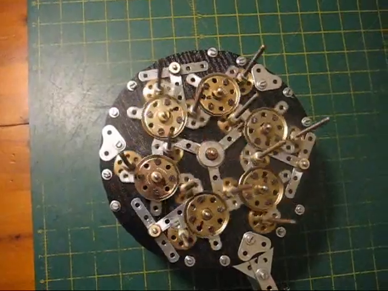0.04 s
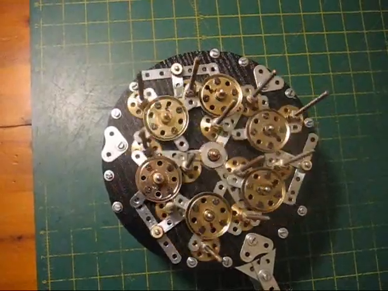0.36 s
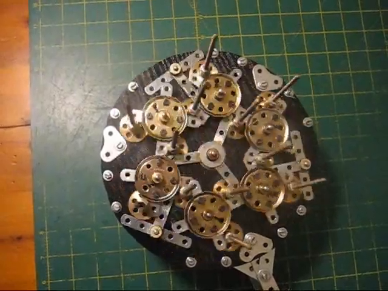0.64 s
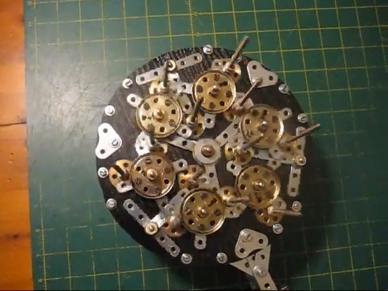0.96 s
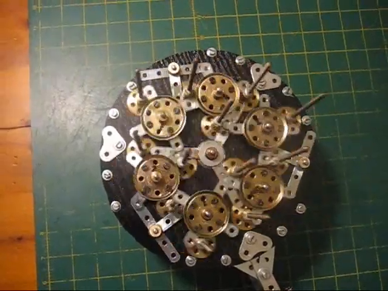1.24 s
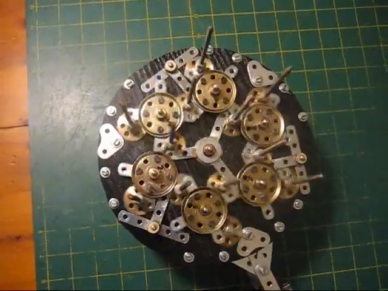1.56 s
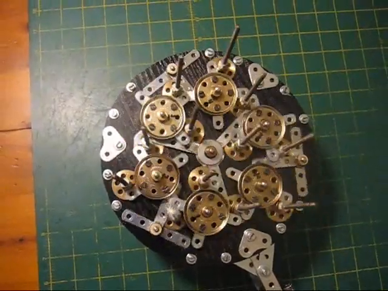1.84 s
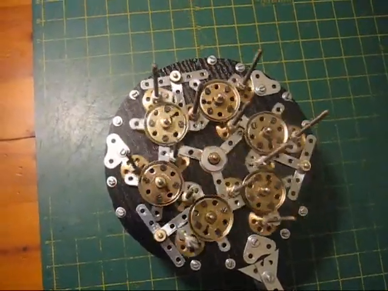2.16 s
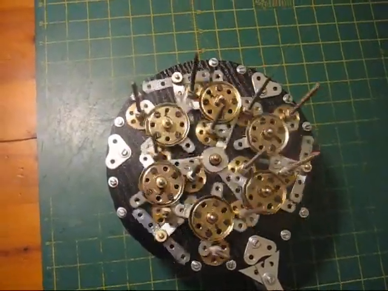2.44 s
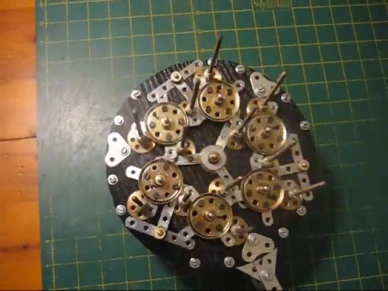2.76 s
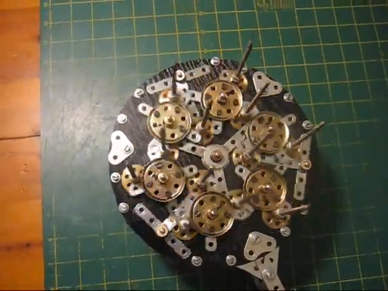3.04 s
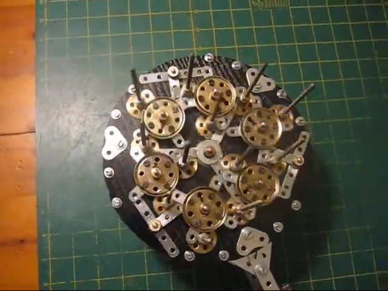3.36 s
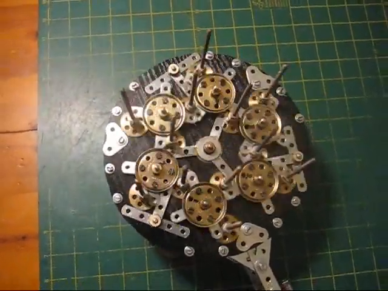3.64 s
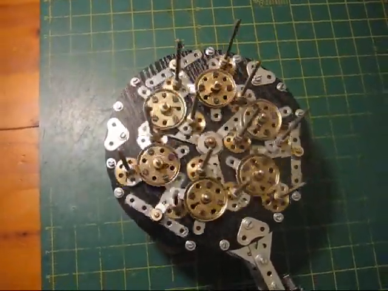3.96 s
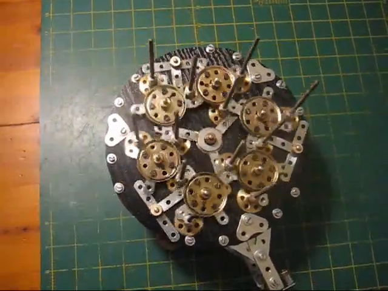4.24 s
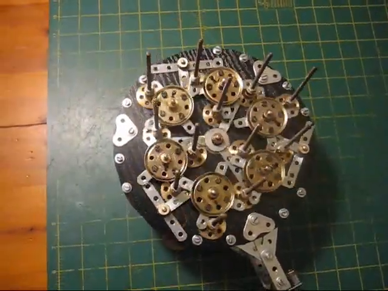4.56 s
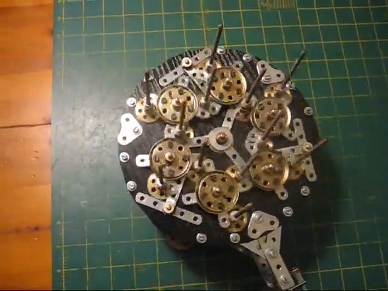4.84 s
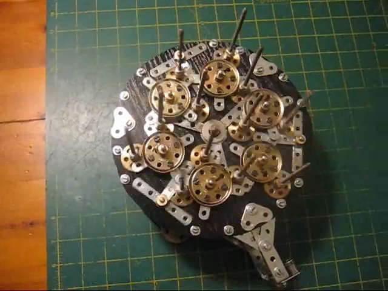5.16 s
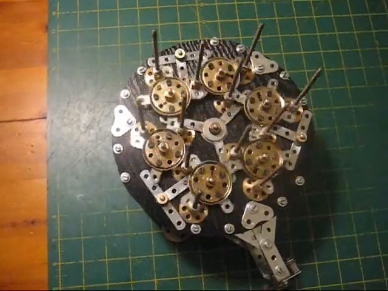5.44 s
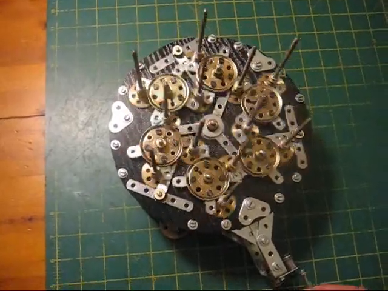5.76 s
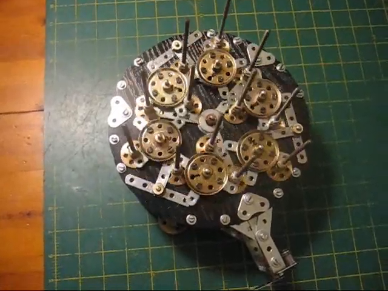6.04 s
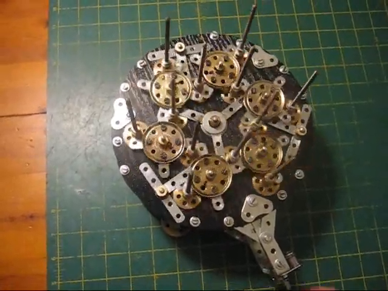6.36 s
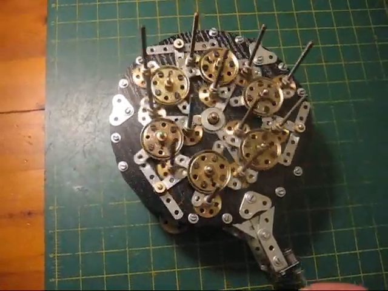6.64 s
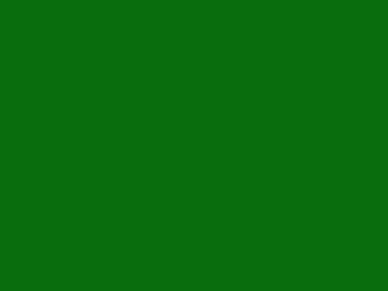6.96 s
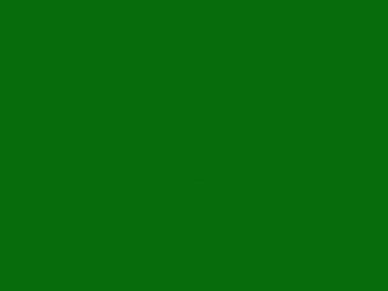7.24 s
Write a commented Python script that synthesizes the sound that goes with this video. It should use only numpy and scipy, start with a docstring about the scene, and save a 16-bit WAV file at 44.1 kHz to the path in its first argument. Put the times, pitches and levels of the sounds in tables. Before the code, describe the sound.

Rapid metallic rattling and sharp, uneven clacks come from a little gear mechanism being turned in spurts. It catches briefly several times, longest a bit past the middle, then clatters on until the sound cuts off. A faint table hum and hiss lie underneath, with one soft tone near the start. It is heard close up in a small, slightly echoing room, sounding thin, bright and grainy.

```python
"""Loose parts clack and gear teeth rattle as a model of brass gears, steel strips and rods turns.
Each clack is a part falling into its slack. The drive runs in surges and hangs at tight spots, and
the teeth rattle harder with the effort. The metal frame rings on, a small room echoes and the table
hums, over a faint hiss and one soft early tone. A small camera close above picks it all up at a
low sampling rate, which mirrors the sound into the treble."""
import sys
import numpy as np
from scipy import signal
from scipy.fft import rfft, irfft
from scipy.io import wavfile
from scipy.ndimage import uniform_filter1d

SR = 44100
rng = np.random.default_rng(int(sys.argv[2]) if len(sys.argv) > 2 else 0)


def dump_mix(stems):
    """Bounce the given channels to the path in sys.argv[1] as a 16-bit WAV at rate SR."""
    frames = np.atleast_2d(stems).T  # one column per channel
    limited = np.clip(frames, -1, 1)  # hard clip at full scale
    pcm = np.round(limited * 32767).astype(np.int16)
    wavfile.write(sys.argv[1], SR, pcm)


N = 326781
TIME = np.arange(N) / SR
HOLD_SAMPLES = 4  # the camera holds each value this long
BAND_HZ = SR / HOLD_SAMPLES / 2  # the highest pitch it can capture
EASY_DB = -32.5  # the effort in easy running


# Loose parts falling into their slack. Each row: start in seconds, relative level in dB,
# base plate thud in dB, bright edge in dB.
CLACK_HITS = [(0.0068, -18, 13.5, 20), (0.0744, -26.5, -12, -8), (0.161, -19.5, -4, -1),
              (0.2424, -20.5, -13.5, -6), (0.4738, -24.5, -28, 2), (0.5327, -25.5, -7, 3),
              (0.5444, -15.5, 2, 16), (0.6437, -19.5, -2.5, 7), (0.767, -18.5, 10.5, 10),
              (0.8251, -17.5, 1.5, 8), (0.8874, -19, 22, 7.5), (0.9472, -19, -4.5, -4),
              (0.982, -19.5, 15.5, 20.5), (1.017, -17, 5.5, 12), (1.177, -20, 3, 10), (1.251, -18.5, -2, 2),
              (1.305, -23.5, 10, 2), (1.4023, -24, -5, 5), (1.4557, -19.5, -12.5, 12),
              (1.533, -20.5, 1.5, 1.0), (1.6109, -19.5, 5.5, 13), (1.6574, -22, -6, 2.5),
              (1.6933, -19.5, -0.5, 12), (1.7332, -26, -1.5, 6.5), (2.056, -23.0, -1, 2),
              (2.1244, -20, -0.5, 6.5), (2.2042, -21.5, -24, -3), (2.297, -23, 4.5, 6), (2.333, -22, -4, 1),
              (2.5094, -25.5, -20, 1), (2.526, -21, 2, 7.5), (2.5656, -17.5, 12.5, 16.5),
              (2.737, -25, -15, 1.5), (2.7928, -23, 3.5, 6), (2.87, -22.5, 0.5, 2.5),
              (2.9471, -25, 16, 1.5), (3.031, -24, -21.5, 6), (3.082, -19.5, 6.0, 14),
              (3.112, -22.5, -9.0, 0.5), (3.3245, -18.5, -4.5, 3), (3.556, -18.5, -4, 3),
              (3.7, -25, -12, -4.5), (3.7324, -27, -9, -6.5), (3.747, -21.5, -13, 7.5), (3.826, -20, -1, 4),
              (4.0054, -23.5, -5.5, 7.0), (4.0463, -20.5, -6.5, 4.5), (4.242, -23, 3, 5),
              (4.3315, -23.5, -13.5, 2), (4.4349, -25, -3.5, -3), (4.6142, -43.5, -22, -12.5),
              (4.6834, -30, -22, 16), (4.709, -29, -8, 1.5), (4.7984, -19, 6, 16),
              (4.8129, -19.5, -10.5, -2.5), (4.8763, -21, -3.5, -4.5), (4.8943, -17, -3.5, 14.5),
              (5.0771, -17, -1, 8), (5.134, -18, 15.5, 0), (5.1497, -25, 26, 8), (5.2018, -17, -6, 5),
              (5.2767, -20, -8.5, 0), (5.3391, -24.0, -11.5, -2.5), (5.459, -20, 13, 10.5),
              (5.5482, -20, -3, -2), (5.608, -22.5, -8.5, 8.5), (5.7751, -17, -4, 27.5),
              (5.951, -18, -3.5, 11.5), (6.0037, -22, -3, 2.5), (6.1356, -27.5, 14.5, 3),
              (6.2122, -26.5, -13.5, 1), (6.2542, -17, -0.5, 15), (6.3757, -21.5, -8, 2),
              (6.4737, -21, -8, 2), (6.5635, -25, -10.5, 2.5), (6.595, -23, 15.5, 13),
              (6.638, -23, -13.5, -7.5), (6.7486, -24, -18.5, -9), (6.7783, -18.5, -4, 9.5),
              (6.9049, -22.5, -9.5, -1)]

def clacks(gain_db=26.0, contact_s=.0043, bounce_s=.011, bounce_db=-10, bounces=2):
    """Each falling part strikes once, briefly or with a scrape, and bounces back ever more softly."""
    out = np.zeros(N + SR)
    for start_s, db, thud_db, edge_db in CLACK_HITS:
        contact_scale, flight_scale = .5 + rng.random(2)
        for bounce in range(bounces + 1):
            blow = struck_part(contact_scale * contact_s, thud_db, edge_db)
            start = int((start_s + bounce * flight_scale * bounce_s) * SR)
            out[start:start + len(blow)] += undb(db + gain_db + bounce * bounce_db) * blow
    return out[:N]


def struck_part(contact_s, thud_db, edge_db, thud_hz=1700, edge_hz=3700, tones=130, size=6144):
    """One blow on a small bolted part: its many tones crack loudly on contact, then ring faintly."""
    place, phase, strength = rng.random((3, tones))
    hz = (np.arange(tones) + place) * BAND_HZ / tones
    db = thud_db / (1 + (hz / thud_hz) ** 6 + (thud_db > 0) * (450 / hz) ** 2)  # a boost skips the bass
    db += edge_db / (1 + (edge_hz / hz) ** 6)
    favoured_hz = rng.random() * BAND_HZ  # the spot that is struck favours one group of tones
    db += 6 * np.exp(-((hz - favoured_hz) / 330) ** 2)
    spectrum = np.zeros(size // 2 + 1, complex)
    spectrum[(hz * size / SR).astype(int)] = undb(db) * strength * np.exp(2j * np.pi * phase)
    t = np.arange(size) / SR
    crack = np.exp(-(t / contact_s) ** 2)
    ring = undb(-17) * fade(t, t60=.27)
    attack = 1 - fade(t, t60=.002)
    return unit(irfft(spectrum) * (crack + ring) * attack)


def rattle(effort_db, easy_ticks_per_s=240, rods_follow=.87):
    """Teeth tick in their gaps, faster, louder and brighter when driven hard; loose rods tap along."""
    surge_db = np.maximum(effort_db - EASY_DB, 0)
    per_s = easy_ticks_per_s * undb(.6 * surge_db)
    teeth = ticks(per_s, scatter_db=2.5, contact_s=.0021, thud_db=2.27, edge_db=2, spread_db=5.5, parts=52)
    teeth /= np.sqrt(uniform_filter1d(teeth ** 2, size=2400) + 1e-9)  # even out the loudness
    rods = ticks(per_s=36, scatter_db=3.8, contact_s=.0054, thud_db=-.5, edge_db=7, spread_db=1, parts=20)
    out = undb(-1.88) * teeth + level(rods, -6) * undb((rods_follow - 1) * surge_db)
    plate = signal.sosfiltfilt(signal.butter(3, 1700, fs=SR, output="sos"), out)
    out += (undb(1.6 - .23 * surge_db) - 1) * plate  # a surge has a smaller share of dull thud
    return out * undb(effort_db + slack_dips())


def ticks(per_s, scatter_db, contact_s, thud_db, edge_db, spread_db, parts):
    """Small parts, some dull and some bright, are struck at random moments with random force."""
    out = np.zeros(N)
    ticks_due = np.cumsum(per_s * np.ones(N)) / SR / parts
    for _ in range(parts):
        thud_shift, edge_shift = spread_db * (2 * rng.random(2) - 1)
        blow = struck_part(contact_s, thud_db + thud_shift, edge_db + edge_shift)
        waits, force = rng.exponential(size=(400, 2)).T
        starts = np.searchsorted(ticks_due, np.cumsum(waits))
        gains = undb(scatter_db * np.minimum(force, 2.5))
        for start, gain in zip(starts[starts < N], gains):
            out[start:start + len(blow)] += gain * blow[:N - start]
    return out


def slack_dips(swing_s=.022, dip_db=-2.5):
    """The rattle dips, in dB, while a part swings free just before its clack."""
    db = np.zeros(N)
    for clack_s, *_ in CLACK_HITS:
        db[max(int((clack_s - swing_s) * SR), 0):int(clack_s * SR)] = dip_db
    return db


# The drive throws the gears across their gaps. Each row: start in seconds, hold in seconds, effort in dB.
DRIVE_SURGES = [(0, 0.071, -22.5), (0.46, 0.084, -22.5), (0.611, 0.048, -23.5), (0.811, 0.13, -25.5),
                (0.937, 0.054, -19), (1.089, 0.037, -23), (1.391, 0.064, -22.5), (1.53, 0.21, -25),
                (1.935, 0.044, -27), (2.126, .03, -27), (2.21, .05, -27.5), (2.512, 0.1, -21.5),
                (2.851, 0.0099, -25.5), (3.039, 0.067, -19.5), (3.179, 0.2, -23), (3.485, 0.022, -20.5),
                (3.625, 0.015, -24), (3.803, 0.057, -25.5), (3.992, 0.16, -23), (4.31, 0.087, -29),
                (4.886, .14, -25.5), (5.058, 0.2, -21.5), (5.356, 0.018, -26), (5.71, .14, -21),
                (5.923, 0.089, -26), (6.218, 0.054, -23), (6.361, 0.022, -26.5), (6.761, 0.063, -21.5),
                (6.919, 0.019, -26.5)]
# The wheel hangs at a tight spot. Each row: start in seconds, end in seconds.
TIGHT_SPOTS = [(.39, .469), (2.08, 2.118), (2.39, 2.445), (3.0, 3.03), (3.93, 3.992), (4.28, 4.33),
               (4.465, 4.684), (4.73, 4.798), (6.095, 6.208)]

def drive_effort(attack_s=.008, fall_db_per_s=84.5, stall_db_per_s=156, stall_depth_db=-18):
    """How hard the gears work, in dB: surges rise, hold and die back; a tight spot runs it down."""
    db = np.full(N, EASY_DB)
    for start, hold, top_db in DRIVE_SURGES:
        rise = np.clip((TIME - start) / attack_s + .5, 0, 1)
        fall_db = fall_db_per_s * np.maximum(TIME - start - hold, 0)
        db = np.maximum(db, EASY_DB + rise * (top_db - EASY_DB) - fall_db)
    for start, end in TIGHT_SPOTS:
        db += np.clip(stall_db_per_s * (start - TIME), stall_depth_db, 0) * (TIME < end)
    return db


# Tones of the frame and wheels. Each row: pitch in Hz, relative level in dB, seconds to fade by 60 dB.
FRAME_TONES = [(808, 2, 0.9), (939, 2.5, 0.28), (1005, 5, 0.18), (1099, 10, 0.04), (1965, -19.5, 0.33),
               (2167, 3, 0.14), (2780, 1, 0.12), (3210, -5, 0.21)]

def frame_ring(blows, gain_db=-21.5):
    """Every blow sets the frame and wheels ringing."""
    t = np.arange(SR // 2) / SR
    ring = sum(undb(db) * fade(t, t60) * np.sin(2 * np.pi * hz * t) for hz, db, t60 in FRAME_TONES)
    return undb(gain_db) * convolve(blows, unit(ring))


# The tone colour of the whole machine. Each row: frequency in Hz, boost or cut in dB.
METAL_COLOUR = [(40, -29.5), (170, -16), (300, -12.5), (550, -11.5), (850, -1.5), (1200, 1.5), (1600, -1.5),
                (1870, -6), (2050, 5), (2280, 4), (3100, 4.5), (3450, 1), (4200, -3), (5500, -5)]

def metal_body(sound):
    """The metal body weakens the bass and favours the bright middle pitches."""
    return colour(sound, METAL_COLOUR)


def room_echo(blows, gain_db=-10, t60=.35, turns_per_s=5, sides=4):
    """The room answers: blows from each side of the wheel find their own reflections."""
    t = np.arange(SR // 2) / SR
    out = np.zeros(N)
    for side in range(sides):
        share = np.maximum(np.cos(2 * np.pi * (turns_per_s * TIME - side / sides)), 0)
        echo = rng.standard_normal(len(t)) * (1 - fade(t, .0033)) * fade(t, t60)
        out += undb(gain_db) * convolve(blows * share, unit(echo))
    return out


# Low tones of the table under the machine. Each row: pitch in Hz, width in Hz, average level in dB.
TABLE_TONES = [(50.6, 12, -57), (82.4, 14, -55), (126, 16, -68.5), (163, 4, -61)]

def table_hum(effort_db, follow=.52):
    """The table hums more strongly as the gears work harder."""
    shaking = rng.standard_normal(N) * undb(follow * effort_db)
    return sum(level(signal.lfilter(*signal.iirpeak(hz, hz / width, SR), shaking), db)
               for hz, width, db in TABLE_TONES)


# The loudness of one soft tone. Each row: time in seconds, level in dB.
SOFT_TONE_LEVELS = [(0, -55), (.18, -47.5), (.35, -50), (.55, -60), (1.0, -67)]

def soft_tone(hz=377):
    """One soft tone swells early on, then sinks to a very faint level and stays there."""
    db = np.interp(TIME, *np.transpose(SOFT_TONE_LEVELS))
    return np.sqrt(2) * np.sin(2 * np.pi * hz * TIME) * undb(db)


def hiss(db=-50.5):
    """A faint, steady hiss and rumble."""
    noise = rng.standard_normal(N)
    return level(colour(noise, [(25, 4), (200, 2.5), (700, 6), (3000, -1), (5500, -3), (SR / 4, -50)]), db)


def undb(db):
    """Turn decibels into a gain."""
    return 10 ** (np.asarray(db) / 20)


def unit(x):
    """Scale to an energy of one."""
    return x / np.sqrt(np.sum(x ** 2))


def level(x, db):
    """Scale to an average (rms) level in dB."""
    return unit(x) * np.sqrt(len(x)) * undb(db)


def fade(t, t60):
    """Die away by 60 dB in t60 seconds."""
    return np.exp(-np.log(1000) * t / t60)


def convolve(x, response):
    """Pass a sound through a ring, an echo or a filter."""
    return signal.oaconvolve(x, response)[:N]


def colour(x, points, size=4096):
    """Boost or cut a sound along a curve of (Hz, dB) points."""
    hz, db = np.transpose(points)
    log_hz = np.log(np.fft.rfftfreq(size, 1 / SR) + 1)
    log_gain = np.log(undb(np.interp(log_hz, np.log(hz), db)))
    cepstrum = irfft(log_gain)
    cepstrum[1:size // 2] *= 2  # folded so that the filter rings only after a blow
    cepstrum[size // 2 + 1:] = 0
    return convolve(x, irfft(np.exp(rfft(cepstrum))))


def scene():
    """Clacks and rattle share one metal body and one room, above a quiet background."""
    effort_db = drive_effort()
    blows = clacks() + rattle(effort_db)
    machine = metal_body(blows + frame_ring(blows) + room_echo(blows))
    return (machine + table_hum(effort_db) + soft_tone() + hiss())[None]


def record(dry, stop_s=7.05, top_hz=16000):
    """The camera samples slowly and holds each value, mirroring the sound into the treble; then it stops."""
    in_band = np.fft.rfftfreq(N, 1 / SR) < BAND_HZ
    narrow = irfft(rfft(dry) * in_band, N)
    held = np.repeat(narrow[:, ::HOLD_SAMPLES], HOLD_SAMPLES, axis=1)[:, :N]
    low_pass = signal.ellip(10, .2, 70, top_hz, fs=SR, output="sos")
    return signal.sosfilt(low_pass, held * (TIME < stop_s))


dry = scene()
out = record(dry)
dump_mix(out)
```